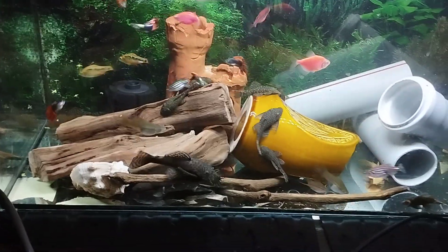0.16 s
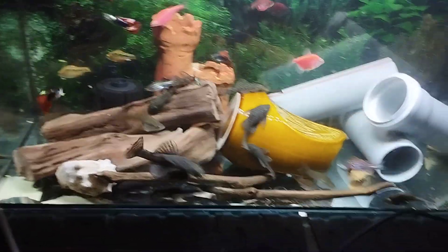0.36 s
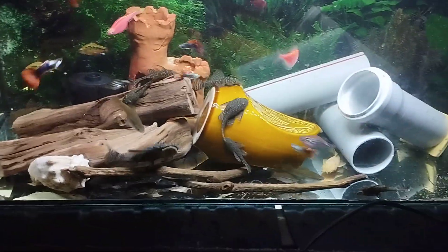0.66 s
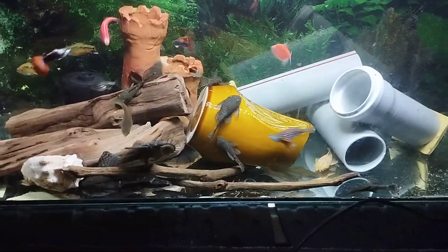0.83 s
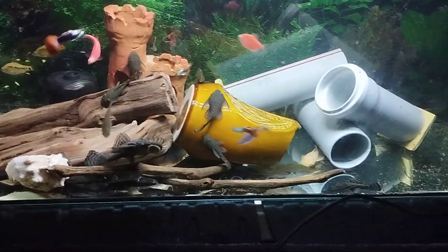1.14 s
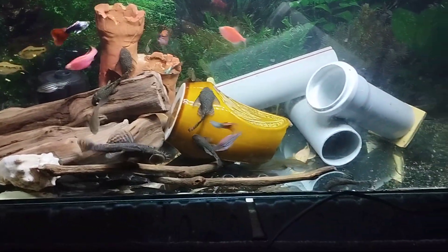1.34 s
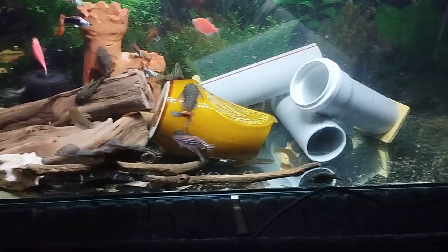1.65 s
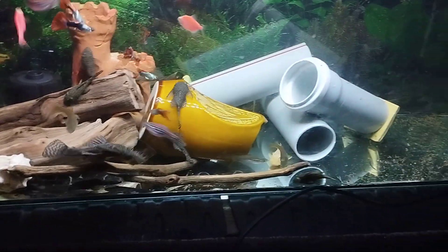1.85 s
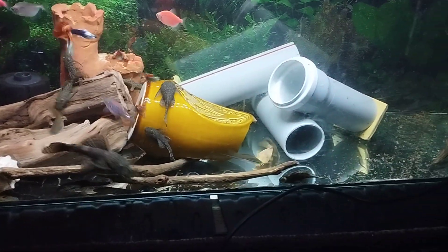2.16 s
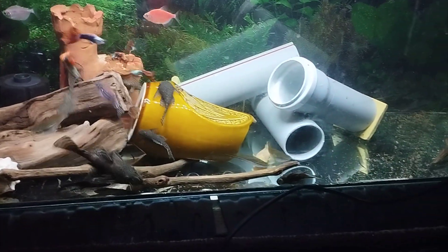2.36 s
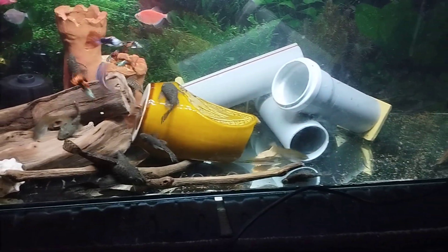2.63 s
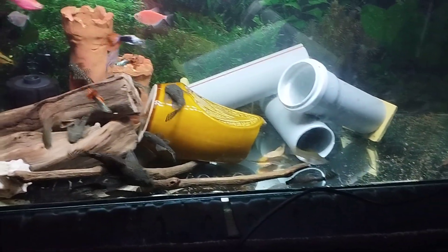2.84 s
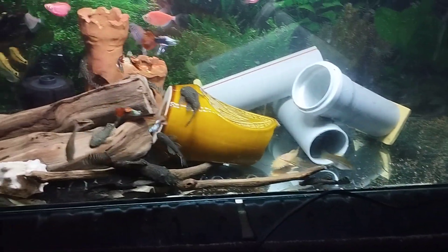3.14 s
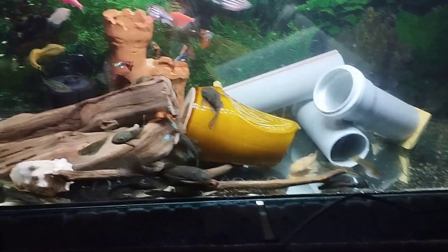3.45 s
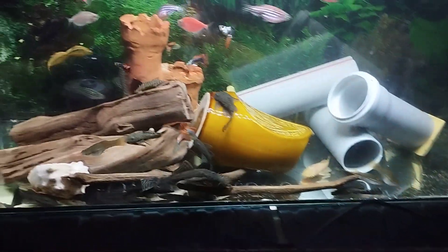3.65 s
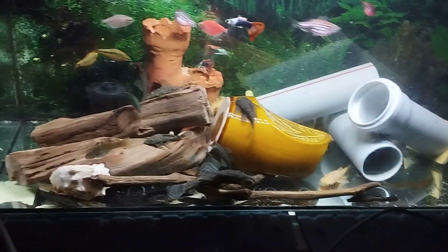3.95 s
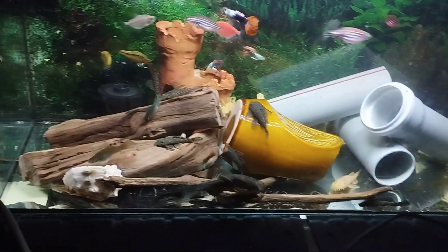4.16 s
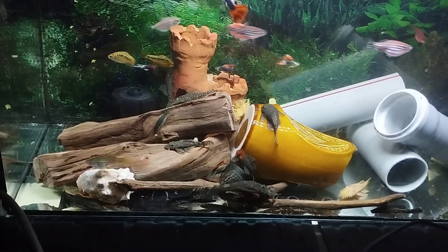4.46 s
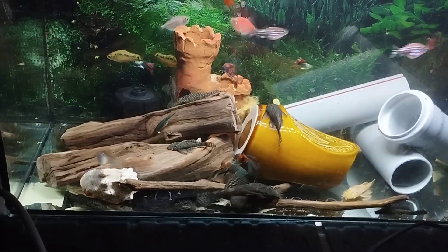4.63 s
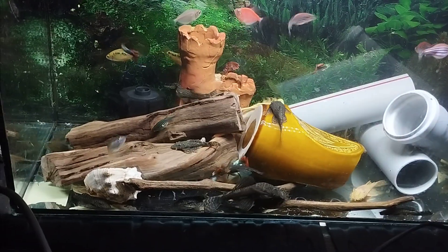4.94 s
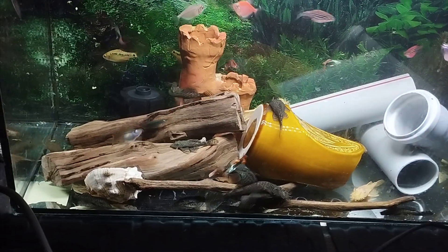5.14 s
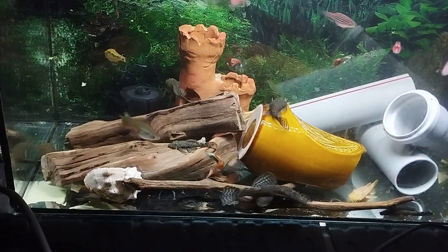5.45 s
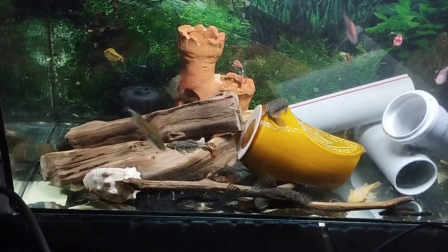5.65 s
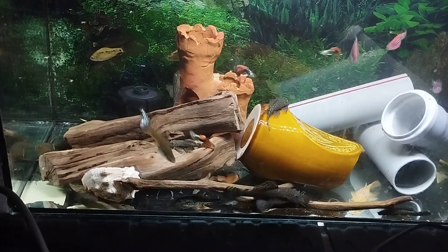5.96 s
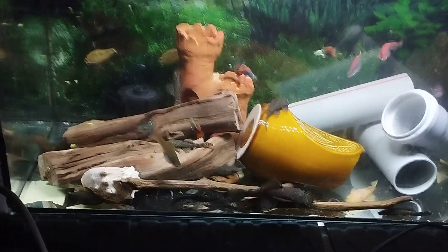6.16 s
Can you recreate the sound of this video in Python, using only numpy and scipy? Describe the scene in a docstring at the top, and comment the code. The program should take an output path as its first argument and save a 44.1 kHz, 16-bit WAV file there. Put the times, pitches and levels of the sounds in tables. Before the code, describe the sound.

Water trickles and plinks in a home fish tank over a low pump hum, with a hard finger knock early and a heavy bump at the end.

```python
"""Fish tank trickle

Water trickles back into a home tank: ringing bubbles plink over a fine spatter of random tiny ones, with a brief echo.
A sum of wavering sine tones makes the steady pump hum; shaped noise makes the air of the room and the hiss.
Twice a finger touches the right port of the hand-held microphone: knocks, scuffing skin and low air pressure."""
import sys
import numpy as np
from scipy import signal
from scipy.fft import rfft, irfft
from scipy.io import wavfile

SR = 44100
rng = np.random.default_rng(int(sys.argv[2]) if len(sys.argv) > 2 else 0)


def wav_out(sig):
    """Save sig, one row per channel (or a flat mono array), as 16-bit PCM at SR to the path in sys.argv[1]."""
    wavfile.write(sys.argv[1], SR, np.round(np.clip(np.atleast_2d(sig).T, -1, 1) * 32767).astype(np.int16))


N = 277653


def gain_of(db):
    """Decibels to amplitude."""
    return 10 ** (np.asarray(db) / 20)


def evened(x):
    """Scales to rms 1."""
    return x / np.sqrt(np.mean(x ** 2) + 1e-30)


def read(points, hz):
    """Reads a table on a log-frequency axis."""
    f, value = np.transpose(points)
    return np.interp(np.log(hz + 1), np.log(f + 1), value)


def add(mix, start_s, sound):
    """Mixes a sound in at start_s, cut off at the end of the mix."""
    part = mix[max(round(start_s * SR), 0):][:len(sound)]
    part += sound[:len(part)]


def slow(top_hz):
    """Noise that falls off steeply above top_hz, rms 1."""
    hz = np.fft.rfftfreq(N, 1 / SR)
    spectrum = rfft(rng.standard_normal(N)) / (1 + (hz / top_hz) ** 4)
    return evened(irfft(spectrum, N))


# Room reverberation. Each row: frequency in Hz, decay time to -60 dB in s.
ROOM_DECAY = [(1000, 0.4), (3000, 0.17), (7000, 0.225), (14000, 0.16)]


def room(x, wet_db, glass_db=-5, glass_s=0.01):
    """Direct sound, quick reflections off glass and lid, then the short tail of the room."""
    size = SR // 3
    t = np.arange(size) / SR
    hits = rng.random((2, size)) < 3000 / SR
    walls = rng.choice([-1., 1.], (2, size)) * hits * (t > .006)
    hz, when, z = signal.stft(walls, SR, nperseg=256)
    decay = gain_of(-60 * when / read(ROOM_DECAY, hz)[:, None])
    tail = signal.istft(z * decay, SR, nperseg=256)[1][:, :size]
    glass_hits = rng.random((2, size)) < 900 / SR
    glass = rng.standard_normal((2, size)) * glass_hits * np.exp(-t / glass_s * 2) * (t > .002)
    echo = np.zeros((2, size))
    for db, h in ((wet_db, tail), (glass_db, glass)):
        echo += gain_of(db) * h / np.linalg.norm(h, axis=1, keepdims=True)
    return x + signal.fftconvolve(x, echo, axes=1)[:, :N]


# Colour of room air and microphone hiss. Each row: frequency in Hz, relative level in dB per Hz.
AIR_COLOUR = [(10, -0.5), (35, -2), (70, -8.5), (120, -15.5), (200, -19), (400, -28), (650, -32),
              (1000, -38), (1800, -46), (4000, -50.5), (6500, -55), (8200, -59.5), (11000, -58),
              (13500, -49.5), (16000, -50.5)]
# Likeness of the ports. Each row: frequency in Hz, left-right correlation (0 to 1).
AIR_LIKENESS = [(60, 0.81), (130, 0.95), (290, 0.69), (640, 0.49), (1400, 0.018), (15000, 0)]
# Balance of the ports. Each row: frequency in Hz, left minus right in dB.
AIR_TILT = [(20, -5.5), (100, -1), (400, 0), (1300, -2), (4400, -1.5), (8000, -0.5), (10500, 5), (15000, 4)]
AIR_DB = -48.5


def air(flicker_db=0.89, flicker_hz=24.76):
    """Room rumble, alike at both ports, thinning to a hiss; the level flickers slightly."""
    hz = np.fft.rfftfreq(N, 1 / SR)
    a, b = rfft(rng.standard_normal((2, N)))
    same = np.clip(read(AIR_LIKENESS, hz), -1, 1)
    tilt_db = read(AIR_TILT, hz) / 2
    left = a * gain_of(tilt_db)
    right = (same * a + np.sqrt(1 - same ** 2) * b) * gain_of(-tilt_db)
    noise = evened(irfft(np.array([left, right]) * gain_of(read(AIR_COLOUR, hz)), N))
    return gain_of(AIR_DB + flicker_db * slow(flicker_hz)) * noise


# Steady tones of the pump and its mains supply.
# Each row: mean frequency in Hz, left level in dB rms, right level in dB rms, both before the waver.
PUMP_TONES = [(25.4, -50, -49), (69.4, -58.5, -64.5), (93.53, -58, -59), (100, -63.5, -60.5),
              (140.1, -57.5, -58.5), (146.4, -49, -48), (157.7, -67.5, -67), (191, -73, -88),
              (199, -79, -79.5), (294, -75.5, -85.5), (298.8, -72.5, -76), (408.6, -81.5, -74),
              (496, -81, -89), (550, -84.5, -76.5), (612, -85.5, -89), (654, -82, -83.5)]


def pump(waver=0.053, drift_rad=0.091):
    """Rotor and mains tones beat together; level wavers in common, phase in proportion to frequency."""
    t, out = np.arange(N) / SR, np.zeros((2, N))
    load = 1 + waver * slow(2.8)
    slip_rad = drift_rad * slow(3)  # for a 150 Hz tone
    for hz, left_db, right_db in PUMP_TONES:
        phase = 2 * np.pi * (hz * t + rng.random()) + slip_rad * hz / 150
        tone = np.sqrt(2) * np.sin(phase)
        out += gain_of([[left_db], [right_db]]) * tone * load
    return out


SEAL_S = 6.1922  # the finger closes the port
# Response of the microphone housing to a tap. Each row: frequency in Hz, relative level in dB per Hz.
HOUSING_COLOUR = [(20, -3.5), (110, 1.5), (200, -3.5), (285, -11), (380, -5), (450, -5.5), (570, 2),
                  (800, -4), (1150, -3), (1750, -8), (2200, -14.5), (3200, -20), (6400, -20), (8500, -45)]
# Skin rubbing on the housing. Each row: frequency in Hz, relative level in dB per Hz.
SCUFF_COLOUR = [(100, 5), (600, -1), (1600, -3), (2300, -7.5), (3500, -14.5), (6400, -15.5), (8200, -35),
                (11000, -41.5), (14000, -28), (16000, -28)]
# Finger taps, levels before the sealed port muffles them.
# Each row: start in s, knock peak in dB, contact time in s, scuff level relative to the knock in dB, scuff length in s.
FINGER_TAPS = [(0.4793, -3.5, 0.00065, -18.5, 0.0041), (6.2164, -22.5, .0008, -20, 0.0014)]


def taps(lag_hz=520, muffle_hz=1300):
    """A soft fingertip pulse excites the housing resonances; skin noise swells and fades around it."""
    size = 4096
    hz = np.fft.fftfreq(size, 1 / SR)
    log_gain = np.log(gain_of(read(HOUSING_COLOUR, abs(hz))))
    response = np.exp(np.conj(signal.hilbert(log_gain)))  # minimum phase
    # all-pass: the low push of air arrives a little after the click
    response *= ((1 - 1j * hz / lag_hz) / (1 + 1j * hz / lag_hz)) ** 2
    housing = np.fft.ifft(response).real[:size // 2]
    t, out = np.arange(N) / SR, np.zeros(N)
    skin_gain = gain_of(read(SCUFF_COLOUR, np.fft.rfftfreq(N, 1 / SR)))
    skin = evened(irfft(rfft(rng.standard_normal(N)) * skin_gain, N))
    for start_s, db, contact_s, scuff_db, scuff_s in FINGER_TAPS:
        pulse = signal.windows.hann(max(round(contact_s * SR), 3))
        knock = np.convolve(housing, pulse)
        add(out, start_s, -gain_of(db) * knock / abs(knock).max())
        swell = np.exp(-abs((t - start_s - 2 * contact_s) / scuff_s) ** 1.62)
        out += gain_of(db + scuff_db) * skin * swell
    # once the port is sealed, only a dull thud gets through
    muffled = signal.sosfilt(signal.butter(N=4, Wn=muffle_hz, fs=SR, output="sos"), out)
    return np.where(t < SEAL_S, out, muffled)


# Shifts of the hand that push air into the port.
# Each row: time of the peak in s, rumble level there in dB rms, time to swell or fade by 1/e in s.
GRIP_NUDGES = [(0.095, -27, .015), (0.185, -36, .025), (0.40, -37, .04), (3.95, -41.5, .2), (5.08, -45, .1),
               (6.22, -10, .028)]


def grip():
    """Amplitude of the air push: each nudge of the hand swells to a peak and fades again."""
    t = np.arange(N) / SR
    return sum(gain_of(db) * np.exp(-abs(t - peak_s) / swell_s) for peak_s, db, swell_s in GRIP_NUDGES)


def press(seal_db=-8, seal_hz=48, seal_t60_s=.11, crackle_db=-28, crackle_t60_s=0.023, dull_hz=4700,
          slide_db=-62):
    """Low wobble of trapped air; sealing makes a decaying pressure jump, a crackle and sliding skin."""
    t = np.arange(SR // 8) / SR
    jump = gain_of(seal_db - 60 * t / seal_t60_s) * np.cos(2 * np.pi * seal_hz * t - np.pi / 4)
    crackle = gain_of(crackle_db - 60 * t / crackle_t60_s) * slow(1900)[:len(t)]
    out = grip() * slow(48)
    add(out, SEAL_S, jump + crackle)
    out = signal.sosfilt(signal.butter(N=14, Wn=min(dull_hz, SR / 3), fs=SR, output="sos"), out)
    slide = gain_of(slide_db) * slow(5500)[:len(t)] * signal.windows.hann(len(t))
    add(out, SEAL_S, slide)
    return out


LAG_S = .00032  # head start of the water's sound at the left port


def ports(x, pan_db):
    """Sound from the outlet reaches the left port a moment before the right."""
    return gain_of([[pan_db / 2], [-pan_db / 2]]) * np.array([x, np.roll(x, round(LAG_S * SR))])


def ring(hz, cycles, rise):
    """A bubble rings for some cycles (to -60 dB), its pitch rising as it nears the surface."""
    age = np.arange(int(cycles / hz * SR) + 8) / SR * hz / cycles  # 1 at -60 dB
    return gain_of(-60 * age) * np.sin(2 * np.pi * cycles * (age + rise * age ** 2))


# Colour of the small bubbles, before weighting by root frequency. Each row: frequency in Hz, relative level in dB.
SWARM_COLOUR = [(1500, -5.5), (2300, -6.5), (2750, -2), (3300, 1), (4000, -3), (4500, -2.5), (5000, -1),
                (5700, -1.5), (6400, -3), (7200, -13), (8500, -33)]


def swarm(per_s, spread_db, cycles, low_hz=1500, top_hz=8500):
    """Bubbles of random pitch and strength ring at random moments, rms 1."""
    out = np.zeros(N)
    for when, place, heft in rng.random((round(per_s * N / SR), 3)):
        hz = low_hz * (top_hz / low_hz) ** place
        gain = gain_of(spread_db * heft + read(SWARM_COLOUR, hz)) * np.sqrt(hz)
        add(out, when * N / SR, gain * ring(hz, cycles, 0.066))
    return evened(out)


def dribble(level_db=-80.5, pan_db=-2.5):
    """Faint bubbles plink throughout, between the larger ones."""
    plinks = gain_of(level_db) * swarm(per_s=75, spread_db=15, cycles=75, top_hz=7000)
    return room(ports(plinks, pan_db), wet_db=-0.5)


# Spurts of the trickle that throw up spray.
# Each row: start in s, strength in dB before the spatter gain, time from start to fall in s.
TRICKLE_SPURTS = [(0.11, -68.5, .04), (0.345, -71, .04), (0.63, -68.5, .035), (0.71, -69, .02),
                  (0.80, -66.5, .045), (0.94, -68, .015), (1.315, -70, .03), (1.455, -73, .03),
                  (1.612, -64.5, .045), (1.755, -69, .025), (1.882, -65, .06), (2.22, -69.5, .03),
                  (2.525, -73, .025), (2.65, -64.5, .025), (2.735, -70.5, .015), (3.145, -73, .02),
                  (3.455, -71, .02), (3.545, -69.5, .07), (3.90, -70, .015), (4.15, -73, .05),
                  (4.35, -72.5, .02), (5.055, -72, .015), (5.22, -69, .04), (5.39, -71, .06),
                  (5.535, -73, .012), (5.635, -68, .015)]
SPURT_RISE_S, SPURT_FALL_DB_PER_S = .01, 420
TRICKLE_DB, EASING_DB_PER_S = -76.5, 0.9  # thin run under the spurts, before the spatter gain


def flow():
    """Strength of the trickle: a thin run slowly easing off, and spurts that rise, hold and die away."""
    t = np.arange(N) / SR
    power = gain_of(TRICKLE_DB - EASING_DB_PER_S * t) ** 2
    age = t[:SR // 2]
    for start_s, db, hold_s in TRICKLE_SPURTS:
        rise = np.minimum(age / SPURT_RISE_S, 1)
        fall_db = SPURT_FALL_DB_PER_S * np.maximum(age - hold_s, 0)
        add(power, start_s, (rise * gain_of(db - fall_db)) ** 2)
    return np.sqrt(power)


def spatter(level_db=-5.0, pan_db=-4.5):
    """A fizz of tiny ringing bubbles, louder as the trickle swells."""
    fizz = swarm(per_s=650, spread_db=19.5, cycles=23) * gain_of(level_db) * flow()
    return room(ports(fizz, pan_db), wet_db=1)


# Clear tiny bubbles bursting at the surface.
# Each row: start in s, level in dB before the common gain, pitch at the start in Hz.
CLEAR_PIPS = [(0.9413, -56, 12000), (1.8694, -67, 7790), (2.341, -64, 8590), (3.2146, -62, 12800),
              (3.5194, -54, 14700), (3.6187, -59, 13400), (4.349, -55.5, 11600), (5.5373, -62, 12200),
              (6.0187, -50.5, 13400)]


def pips(level_db=7, cycles=13, pan_db=6, faint_per_s=9, faint_db=-69, faint_spread_db=10):
    """The smallest bubbles burst with a thin tick: a few clear ones among many faint ones."""
    out = np.zeros(N)
    for start_s, db, hz in CLEAR_PIPS:
        add(out, start_s, gain_of(db + level_db) * ring(hz, cycles, 0.12))
    for when, pitch, heft in rng.random((round(faint_per_s * N / SR), 3)):
        tick = ring(11000 + 4000 * pitch, cycles, .1)
        add(out, when * N / SR, gain_of(faint_db + faint_spread_db * heft) * tick)
    return room(ports(out, pan_db), wet_db=4)


# Clear bubbles. Each row: start in s, level in dB before the common gain, pitch at the start in Hz,
# left minus right in dB.
CLEAR_BUBBLES = [(0.11, -59, 4400, -1.5), (0.135, -58, 4400, 2), (0.174, -61, 2170, 0),
                 (0.199, -61, 3590, -4), (0.29, -60, 2260, 3), (0.319, -62, 1810, -4),
                 (0.346, -61, 3110, -8), (0.637, -60.5, 2560, -6), (0.685, -62, 1950, -4.5),
                 (0.719, -60.5, 2180, -6), (0.766, -60, 3570, -6), (0.809, -60, 5640, -4),
                 (0.819, -63, 2640, -3.5), (0.884, -63, 2220, -7), (0.946, -61, 3560, -4.5),
                 (1.078, -61, 2990, -6), (1.161, -58.5, 2600, -4), (1.189, -63, 2160, -5.5),
                 (1.239, -61, 4250, -5), (1.44, -59.5, 3100, -6), (1.493, -52, 2440, 0),
                 (1.546, -61, 2410, -3.5), (1.59, -61, 1830, -9), (1.626, -60, 2380, -5.5),
                 (1.689, -61.5, 2750, -8), (1.739, -62.5, 3890, -10), (1.885, -61, 3460, -9),
                 (1.941, -63, 3510, -10), (2.073, -53.5, 2350, -4), (2.147, -57, 1730, -1.5),
                 (2.307, -59, 1970, -6), (2.308, -62, 3500, -5), (2.375, -62, 2200, -6),
                 (2.414, -59.5, 2200, -5.5), (2.648, -52, 2360, -3), (2.741, -58.5, 3220, -8),
                 (2.799, -63, 5450, -2.5), (2.859, -64, 2920, -6), (2.934, -62, 2240, -3.5),
                 (3.07, -55.5, 3390, -8), (3.099, -61, 2200, -2.5), (3.289, -64, 3470, -4.5),
                 (3.377, -63, 3050, -3), (3.427, -61, 2670, -3), (3.529, -58, 3080, -4.5),
                 (3.57, -62.5, 1850, -2.5), (3.679, -63.5, 3110, -9), (3.799, -62.5, 2220, -2.5),
                 (3.913, -60.5, 3140, -6), (4.097, -62, 3000, -5), (4.133, -61, 2910, -3.5),
                 (4.311, -57.5, 2130, -2), (4.473, -61.5, 1780, -1.5), (4.499, -61.5, 3210, -3),
                 (4.541, -55, 3460, -6), (4.724, -64, 3580, .5), (4.77, -64, 5350, -2.5),
                 (4.846, -64, 3130, -2.5), (5.061, -53.5, 3110, -2.5), (5.145, -59, 3480, -3.5),
                 (5.177, -58, 2230, 1), (5.228, -58.5, 2190, 1), (5.63, -55.5, 3200, -3),
                 (5.712, -62, 3750, -2), (5.729, -63, 2860, -4), (5.849, -62, 2010, 3)]


def bubbles(level_db=2.0, cycles=54, rise=0.1, splash_db=-11.0, splash_cycles=9,
            train_db=-14, train_s=.035, train_spread=1.5):
    """Each drop smacks the surface and traps a ringing bubble; weaker ones break off just after it."""
    out = np.zeros((2, N))
    chances = rng.uniform(-0.9, 1, (len(CLEAR_BUBBLES), 5, 3))
    for (start_s, db, hz, pan_db), chance in zip(CLEAR_BUBBLES, chances):
        life, colour, _ = chance[0]
        plink = np.zeros(SR // 10)
        add(plink, 0, ring(hz, cycles * 1.23 ** life, rise))
        splash = ring(hz * 1.2 * 1.15 ** colour, splash_cycles, 0)
        add(plink, 0, gain_of(splash_db) * splash)
        for late, pitch, heft in chance[1:]:
            follower = ring(hz * 1.092 * train_spread ** pitch, cycles * 0.62, rise)
            follower_gain = gain_of(train_db + 3 * (heft - late))
            add(plink, train_s * (1 + late) / 2, follower_gain * follower)
        add(out[0], start_s, gain_of(level_db + db + pan_db / 2) * plink)
        add(out[1], start_s + LAG_S, gain_of(level_db + db - pan_db / 2) * plink)
    return room(out, wet_db=-1.5)


def scene():
    """The tank in its room, and the finger heard by the right port alone."""
    finger = np.array([np.zeros(N), taps() + press()])
    return air() + pump() + finger + dribble() + spatter() + pips() + bubbles()


STOP_S, STOP_FADE_S, EDGE_HZ = 6.2655, .004, 15850


def record(dry):
    """Fades to silence by STOP_S, then low-passes at EDGE_HZ."""
    running = np.clip((STOP_S - np.arange(N) / SR) / STOP_FADE_S, 0, 1)
    edge = signal.firwin(511, EDGE_HZ, window=("kaiser", 9), fs=SR)
    return signal.oaconvolve(dry * running, edge[None], "same")


dry = scene()
out = record(dry)
wav_out(out)
```